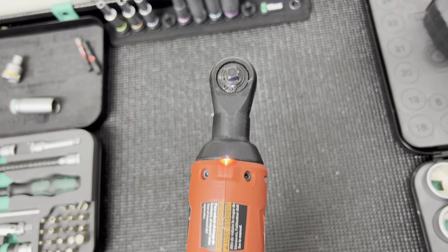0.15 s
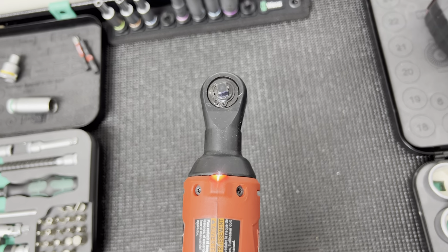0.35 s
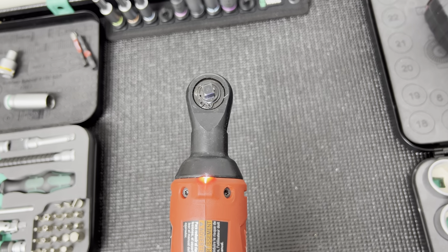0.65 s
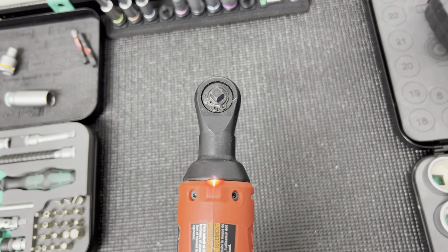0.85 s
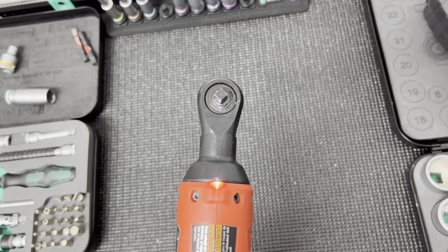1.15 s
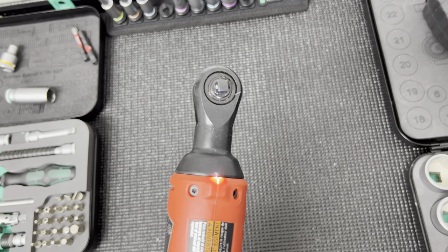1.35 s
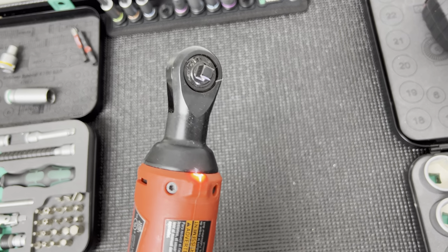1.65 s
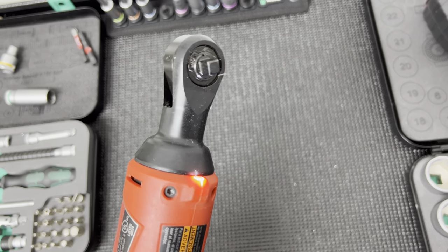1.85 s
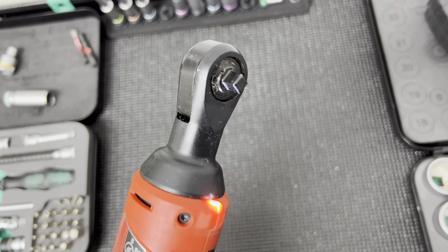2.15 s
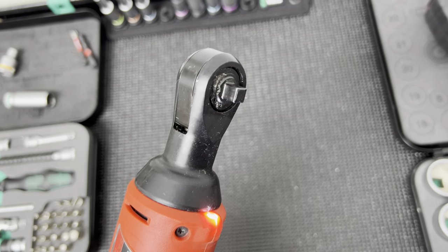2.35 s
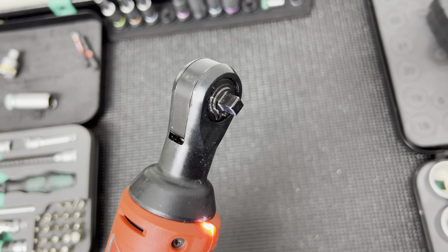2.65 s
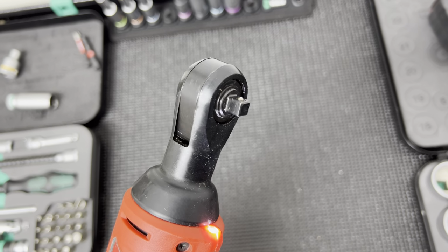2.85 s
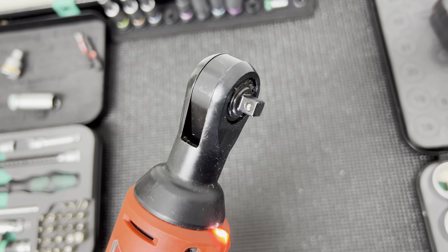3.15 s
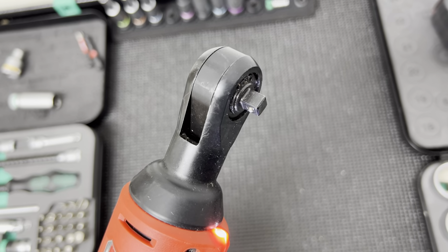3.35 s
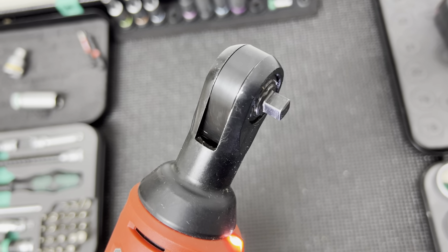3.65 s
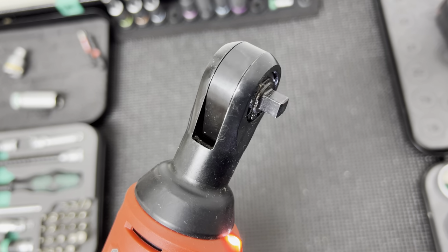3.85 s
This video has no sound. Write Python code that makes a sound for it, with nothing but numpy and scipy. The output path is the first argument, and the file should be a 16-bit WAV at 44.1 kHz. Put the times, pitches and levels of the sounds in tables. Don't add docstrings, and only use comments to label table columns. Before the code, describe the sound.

After quiet room tone, low hand rumble and small plastic clicks, a handheld power ratchet starts up, snapping bright double clacks with dull housing knocks and whirring gears at changing speed, heard close and dry indoors.

```python
import sys
import numpy as np
from scipy import signal
from scipy.fft import rfft, irfft
from scipy.io import wavfile
from scipy.ndimage import uniform_filter1d

SR = 44100
rng = np.random.default_rng(int(sys.argv[2]) if len(sys.argv) > 2 else 0)


def wrap_up_sound(samples):
    columns = np.atleast_2d(samples).T
    tamed = np.clip(columns, -1, 1)
    steps = np.round(tamed * 32767).astype(np.int16)
    wavfile.write(sys.argv[1], SR, steps)


def volts_from_db(level):
    exponent = np.asarray(level, float) / 20
    return 10 ** exponent


N = 176400
T = np.arange(N) / SR
HZ = np.fft.rfftfreq(N, 1 / SR)
BOUNCE_S = .0016

# frequency in Hz, width in Hz, level in dB.
HOUSING = [(390.7, 33, -24), (471, 30, -21.5), (610, 83, -17), (880, 30, -11), (1111, 264, 3),
           (1308, 280, -5), (1490, 280, -3.5), (1850, 700, -6.5), (2353, 425, -12.5), (2620, 540, -1.5),
           (3180, 230, -17), (4330, 930, -2.5)]


def evened(x):
    return x / np.sqrt(np.mean(x ** 2) + 1e-20)


def over_time(points):
    return np.interp(T, *np.transpose(points))


def over_hz(points):
    f, value = np.transpose(points)
    return np.interp(np.log(HZ + 1), np.log(f + 1), value)


def noise():
    return rng.standard_normal((2, N))


def coloured(points):
    return evened(irfft(rfft(noise()) * volts_from_db(over_hz(points)), N))


def resonate(x, hz, width):
    r, w = np.exp(-np.pi * width / SR), 2 * np.pi * hz / SR
    return signal.lfilter([(1 - r * r) / 2, 0, (r * r - 1) / 2], [1, -2 * r * np.cos(w), r * r], x)


def body(x, modes):
    ringing = 0
    for hz, width, db in modes:
        mode = resonate(resonate(x, hz, 1.446 * width), hz, 1.446 * width)
        ringing = ringing + volts_from_db(db) * np.sqrt(SR / (np.pi * width)) * mode
    return ringing


def bursts(times, levels_db, t60, rise_s=.0001):
    train, at = np.zeros(N), np.round(np.asarray(times) * SR).astype(int)
    np.add.at(train, at[at < N], volts_from_db(levels_db)[at < N])
    t = T[:SR // 2]
    shape = (1 - np.exp(-(t / rise_s) ** 2)) * volts_from_db(-60 * t / t60)
    return signal.oaconvolve(train, shape)[:N]


def wavering(turns, db, waver_db, size):
    waver = rng.standard_normal(N)
    waver = evened(uniform_filter1d(uniform_filter1d(waver, size=size), size=size))
    return np.sqrt(2) * volts_from_db(db + waver_db * waver) * np.sin(2 * np.pi * (turns + rng.random()))


def crank():
    # start in seconds, snap in dB, second snap in dB relative to it, housing
    # in dB.
    strokes = [(0.8137, -13.5, -3, -23), (0.8899, -12, -2.5, -23.5), (0.9506, -13, 2, -23.5),
               (1.0044, -10, -1.5, -24.5), (1.0561, -10, -3, -26.5), (1.1058, -9, -1, -25),
               (1.1574, -11, -4, -33.5), (1.2134, -11.5, 0, -25), (1.2784, -10, -3, -23),
               (1.3473, -8.5, -2, -19.5), (1.4228, -8, -0.5, -23), (1.5069, -10.5, -0.5, -24.5),
               (1.5962, -8.5, -0.5, -23), (1.6909, -8.5, 0, -21), (1.7929, -5, -5.5, -21.5),
               (1.9019, -7.5, -3, -23.5), (2.016, -7.5, -3, -22.5), (2.1319, -10, -1.5, -25),
               (2.2435, -9, -2, -25), (2.352, -10.5, -0.5, -25.5), (2.455, -6.5, -5.5, -25.5),
               (2.5542, -9, -2.5, -24.5), (2.6498, -7, -8, -23.5), (2.7432, -11, 1, -22.5),
               (2.829, -12, -0.3, -26), (2.9078, -10, -1.5, -25), (2.9817, -7.5, -7, -27),
                    (3.0527, -6.5, -4, -26.5), (3.1205, -8.5, -3.5, -28.5), (3.1872, -8, -3, -22.5),
                    (3.2524, -8, -0.2, -28.5), (3.3181, -8, -0.5, -27), (3.3799, -7, -2, -19),
                    (3.4434, -8, -8, -26.5), (3.5056, -9, -5.5, -21), (3.5697, -9.5, -5.5, -21),
                    (3.6318, -7.5, -3.5, -24.5), (3.6942, -8, -3.5, -24.5), (3.7587, -11.5, -4, -33.5),
                    (3.8228, -12.5, -6.5, -23), (3.8875, -10.5, -3.5, -25.5), (3.9518, -6.5, -8.5, -27)]
    lag_s, spin_up_s = .0015, .21
    rows = np.array(strokes)
    s = rows[:, 0] + lag_s
    gaps = np.diff(s, append=2 * s[-1] - s[-2])
    turns = np.interp(T, [s[0] - spin_up_s, *s, s[-1] + gaps[-1]], np.arange(len(s) + 2))
    return s, rows, gaps, uniform_filter1d(turns, size=4000, mode="nearest")


def pawl_ring(snaps, snaps_db, hits, hits_db):
    # frequency in Hz, width in Hz, level in dB; the first four are the lower ring.
    pawl_modes = [(5110, 1100, -28), (5898, 1490, -19), (6728, 1330, -21.5), (7340, 510, -36.5),
                  (11820, 650, -18.5), (12740, 670, -5.5), (13410, 1220, -2.5), (11470, 1260, -34),
                  (14200, 1460, -28.5)]
    # time in seconds, level in dB.
    clack_db = [(.8, 9.5), (1.0, -2), (1.4, -1.5), (1.8, -3), (2.0, -0.5), (2.4, 3), (2.8, 2.5),
                (3.15, -2.5), (3.65, 2.5), (4, 4.5)]
    grit = .45 * bursts(hits, hits_db, .007)
    crack = .63 * bursts(hits, hits_db, .0019)
    tail = bursts(snaps, snaps_db - 31.5, .17, .003)
    tick = 4 * bursts(hits, hits_db, .00015, .00001)
    struck = (grit + crack + tail) * noise() + tick
    return volts_from_db(over_time(clack_db)) * body(struck, pawl_modes[:4]) + body(struck, pawl_modes[4:])


def blows(at, db, rise_s):
    push = bursts(at, db, .017, rise_s) + bursts(at, db - 29, .4, .0034)
    return push * noise() + 3 * bursts(at + BOUNCE_S, db, .0003, .00002)


def housing_ring(snaps, snaps_db, snaps_bright_db, knocks, knocks_db, knocks_bright_db):
    snap_rise_s, knock_rise_s = .0018, .0028
    dull = blows(snaps, snaps_db, snap_rise_s) + blows(knocks, knocks_db, knock_rise_s)
    sharp = (blows(snaps, snaps_db + snaps_bright_db, snap_rise_s)
             + blows(knocks, knocks_db + knocks_bright_db, knock_rise_s))
    return body(dull, [*HOUSING[:8], HOUSING[-1]]) + volts_from_db(2.5) * body(sharp, HOUSING[8:-1])


def ratchet(s, rows, gaps):
    # knock in seconds, knock in dB, knock brightness in dB, snap brightness in dB.
    knock_rows = [(0.8485, -19, 0.5, 6), (0.9138, -22, 5.5, 11), (0.971, -29, 11, 1.5), (1.023, -28, 9, 4),
                  (1.0763, -25, -2, 5), (1.1258, -17, 0, 4.5), (1.1776, -22.5, 8.5, 8),
                  (1.2407, -20, -2, 3), (1.303, -19.5, 2, 1), (1.3765, -29, 4, 3.5), (1.4576, -22, -4, 5.5),
                  (1.544, -22, -7, 7), (1.633, -24, 1, 7), (1.7315, -23.5, -9, -2), (1.8344, -19.5, -5, 7),
                  (1.9454, -23, -7, 8), (2.0587, -26, 2.5, 2.5), (2.1757, -21.5, -2.5, -1),
                  (2.287, -22.5, -4, 0.5), (2.3897, -26.5, 1, 0.5), (2.495, -23, -10, -1),
                  (2.596, -29, -7, 4.5), (2.6865, -35, 2, -1.5), (2.78, -23.5, -17, -3.5),
                  (2.8618, -24, -1, -1), (2.938, -26.5, 4.5, -2), (3.0111, -18.5, -8, 5),
                  (3.0818, -21, -2, 3.5), (3.1464, -29, 11, 0.5), (3.2152, -23, -0.5, -5),
                  (3.2776, -36, -3, 4.5), (3.3455, -26, -16, 5), (3.4103, -29, -16, -1),
                  (3.469, -20, -7, -5), (3.53, -20, 2, -6), (3.5944, -16, -5, -15), (3.6567, -20, -21, 0.5),
                  (3.721, -18.5, -18, -0.5), (3.7838, -20.5, -5, -16), (3.85, -19, -2, -12),
                  (3.912, -21.5, -22, 3.5), (3.977, -26, -17, -8)]
    # time in seconds, level in dB.
    take_up = [
        (0.732, -42),
        (0.759, -39),
        (0.777, -34),
        (0.793, -32),
        (0.804, -32),
    ]
    knock, knock_db, knock_bright_db, snap_bright_db = np.transpose(knock_rows)
    slack, slack_db = np.transpose(take_up)
    knock_db = knock_db - 1.5
    luck = rng.standard_normal((len(s), 4))
    second, back = s + .146 * gaps, s + .96 * gaps

    snaps = np.r_[s, second]
    snaps_db = 8 + np.r_[rows[:, 1], rows[:, 1] + rows[:, 2]]
    luck_bounce = np.r_[luck[:, 0], luck[:, 1]]
    bounces = snaps + BOUNCE_S * (1 + .12 * luck_bounce)
    bounces_db = snaps_db - 9 + 3 * np.clip(luck_bounce[::-1], -2, 1)
    hits = np.r_[snaps, bounces, knock, back, slack]
    hits_db = np.r_[snaps_db, bounces_db, knock_db - 13, knock_db - 17, slack_db]

    body_db, spread_db = -3, 2.5
    blow_db = body_db + np.r_[rows[:, 3], rows[:, 3] + spread_db * luck[:, 2]]
    bright_db = np.r_[snap_bright_db, snap_bright_db + spread_db * luck[:, 3]]
    soft = np.r_[knock, back, slack]
    soft_db = body_db + np.r_[knock_db, knock_db - 4.5, slack_db]
    soft_bright_db = np.r_[knock_bright_db, knock_bright_db, 0 * slack]
    return (pawl_ring(snaps, snaps_db, hits, hits_db)
            + housing_ring(snaps, blow_db, bright_db, soft, soft_db, soft_bright_db))


def gear_hiss(turns):
    # frequency in Hz, density in dB per Hz.
    whir_spectrum = [(150, -57), (250, -41), (597, -0.5), (4120, -5), (5070, -6.5), (7310, -10),
                     (8260, -13), (13000, -14.5), (16000, -51)]
    gate = 1 + .35 * np.cos(2 * np.pi * 11 * turns)
    hiss = gate * coloured(whir_spectrum)
    hum = evened(body(gate * noise(), HOUSING))
    chance, size = rng.random((2, 2, N))
    impacts = (chance < 600 / SR) * volts_from_db(-3.5 * np.log(size + .0056))
    rattle = evened(body(gate * impacts, HOUSING))
    return hiss + volts_from_db(-10) * hum + volts_from_db(-2) * rattle


def gear_tones(turns):
    gear_orders = [26.26, 39.4, 52.5, 65.6, 72.5, 80.5, 93]
    gear_db = [-10, -5, -9, -7, -13, -12, -17]
    # frequency in Hz, width in Hz, level in dB.
    case_modes = [(450, 50, -4), (570, 70, 2), (700, 160, 2), (840, 70, 3), (1600, 450, -3)]
    # time in seconds, tone level under load in dB.
    load_db = [(.8, 2), (1.1, 4), (1.4, 3), (1.7, 0), (2.1, 2), (2.6, -1), (3.1, 1), (3.6, 2), (4, 2)]
    sagging = turns + .0012 * np.sin(2 * np.pi * turns)
    streams = []
    for _ in ("direct", "diffuse"):
        streams.append(sum(wavering(order * sagging, db, 2.8, size=900)
                           for order, db in zip(gear_orders, gear_db)))
    tones = np.array(streams)
    cased = sum(volts_from_db(db) * resonate(resonate(tones, hz, width), hz, width) for hz, width, db in case_modes)
    return volts_from_db(over_time(load_db)) * cased


def squeaks():
    # start in seconds, length in seconds, frequency in Hz, level in dB.
    squeak_rows = [
        (3.077, 0.02, 1960, -34),
        (3.152, 0.02, 1980, -35.5),
        (3.21, 0.018, 2000, -35),
    ]
    return sum(volts_from_db(db) * np.sin(np.pi * np.clip((T - s) / length, 0, 1)) * np.sin(2 * np.pi * hz * T)
               for s, length, hz, db in squeak_rows)


def motor(turns):
    # time in seconds, whir level in dB.
    whir_db = [(.7, -75), (.72, -60), (.79, -48), (1.05, -40.5), (1.4, -48.5), (2.1, -47.5), (2.7, -45.5),
               (3.3, -41.5), (4, -41)]
    return volts_from_db(over_time(whir_db)) * (T > .69) * (gear_hiss(turns) + gear_tones(turns)) + squeaks()


def whine():
    # level once running in dB, extra while stalled in dB, wander in dB.
    running_db = [-54.5, -55.5, -93, -50.5, -73, -102, -86]
    stalled_db = [10.5, 3.5, 5, -8, 15, 3, -4]
    waver_db = [4, 2.5, 3, 1.5, 3, 3, 3]
    start_s, rise_s, stall_s, switching_hz = .705, .0041, .12, 1828.8
    on = np.clip((T - start_s) / rise_s, 0, 1)
    stalled = np.exp(-np.maximum(T - start_s, 0) / stall_s)
    tones = 0
    for k, (db, extra_db) in enumerate(zip(running_db, stalled_db)):
        tones = tones + wavering((k + 1) * switching_hz * T, db + extra_db * stalled, waver_db[k], size=350)
    return on * np.ones((2, 1)) * tones


def trigger():
    # time in seconds, level in dB, brightness in dB.
    clicks = [
        (0.329, -89, -22),
        (0.441, -42, -14),
        (0.6, -44.5, -36),
        (0.629, -74, -25),
        (0.714, -39, -18.5),
    ]
    # frequency in Hz, width in Hz, level in dB.
    hollow_modes = [(1134, 300, 6), (1470, 410, 3.5), (2220, 600, -17)]
    s, db, bright_db = np.transpose(clicks)
    tick = np.diff(bursts(s, db + bright_db, .013, .00071) * noise(), prepend=0)
    ring = bursts(s, db, .017, .0016) + bursts(s, db - 27, .27, .004)
    return body(ring * noise(), hollow_modes) + body(tick, [(4500, 3000, -1), (6850, 1700, -7)])


def ports(pair):
    # frequency in Hz, phase in radians.
    port_phase = [(1800, 0),
                  (3900, 0.85), (5000, 2.13), (5900, 0.12), (7300, 0.79), (9500, 1.71), (11500, 2.12),
                  (13500, 2.93)]
    # frequency in Hz, left over right in dB.
    lean_db = [(500, 0), (1500, -1), (2700, 0.5), (4500, 0)]
    # frequency in Hz, diffuse level in dB.
    diffuse_db = [(150, -1), (350, -1), (600, -5), (1300, -14), (1900, -16), (2700, -7), (4500, -8),
                  (7000, -20)]
    direct, diffuse = rfft(pair)
    turn = np.exp(.5j * over_hz(port_phase)) * volts_from_db(.5 * over_hz(lean_db))
    side = diffuse * volts_from_db(over_hz(diffuse_db))
    return irfft(np.array([direct * turn + side, direct / turn - side]), N)


def room():
    # frequency in Hz, density in dB per Hz.
    tone_spectrum = [(25, -67), (100, 1.5), (250, -6.5), (600, -13.5), (1500, -24.5), (2000, -17),
                     (2700, -27.5), (7000, -29), (10000, -37)]
    # frequency in Hz, side over mid in dB.
    side_db = [(60, -5), (180, -2.5), (500, 6), (1650, -2.5), (9000, 2)]
    # time in seconds, rumble level in dB.
    rumble_db = [(0, -72.5), (.6, -68.5), (1.1, -61.5), (1.4, -82), (2.3, -75), (4, -70.5)]
    mid, side = volts_from_db(-74.5) * coloured(tone_spectrum)
    side = irfft(rfft(side) * volts_from_db(over_hz(side_db)), N)
    rumble = coloured([(25, -16), (38, -16), (50, -4), (90, -3.5), (140, -7.5), (300, -28), (600, -78)])
    low = volts_from_db(over_time(rumble_db)) * rumble
    return np.array([mid + side, mid - side]) + low[0] + .27 * low[1] * np.array([[1], [-1]])


def scene():
    s, rows, gaps, turns = crank()
    tool = ratchet(s, rows, gaps) + motor(turns) + whine() + trigger()
    no_bass = signal.butter(5, 88, "high", fs=SR, output="sos")
    return (T > .2) * ports(signal.sosfilt(no_bass, tool)) + room()


def faint(x, taps, db):
    band = signal.oaconvolve(x, taps, "same")
    shut = uniform_filter1d(band ** 2, size=150) < volts_from_db(2 * db)
    return band * uniform_filter1d(1. * shut, size=60)


def roll_off(x):
    return signal.sosfilt(signal.butter(12, 17140, fs=SR, output="sos"), x)


def record(dry):
    mid_taps = signal.firwin(255, 13500, pass_zero=False, fs=SR)
    side_taps = signal.firwin(255, [5800, 9600], pass_zero=False, fs=SR)
    top = faint(dry.mean(0), mid_taps, -47)
    side = faint(.5 * (dry[0] - dry[1]), side_taps, -54)
    x = dry - top - side * np.array([[1], [-1]])
    x = x / (1 + abs(x / .95) ** 4) ** .25
    band_limit = signal.firwin(127, 17800, window=("kaiser", 8), fs=SR)
    x = signal.oaconvolve(x, band_limit[None], "same")
    return roll_off(x)


dry = scene()
out = record(dry)
wrap_up_sound(out)
```